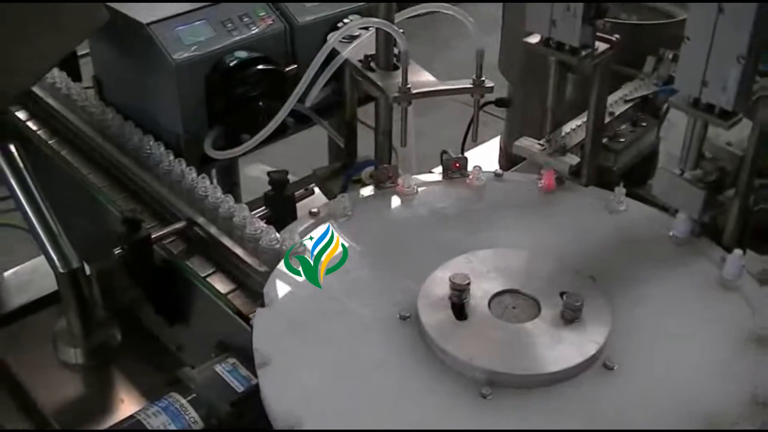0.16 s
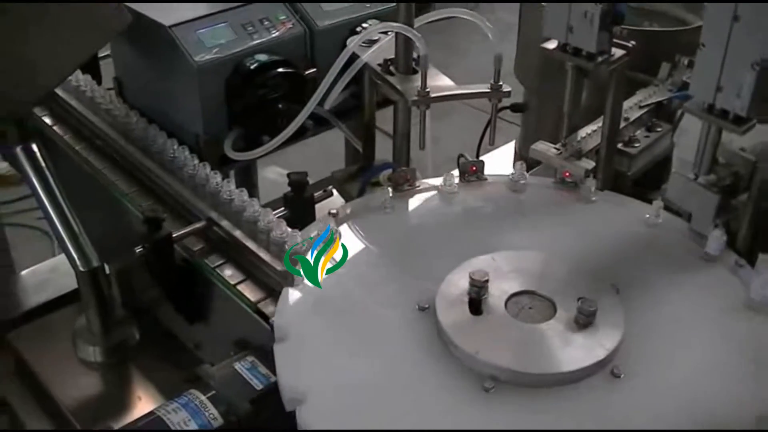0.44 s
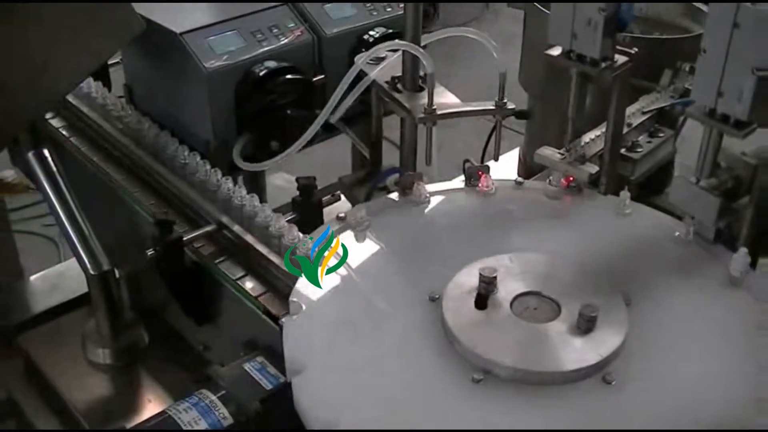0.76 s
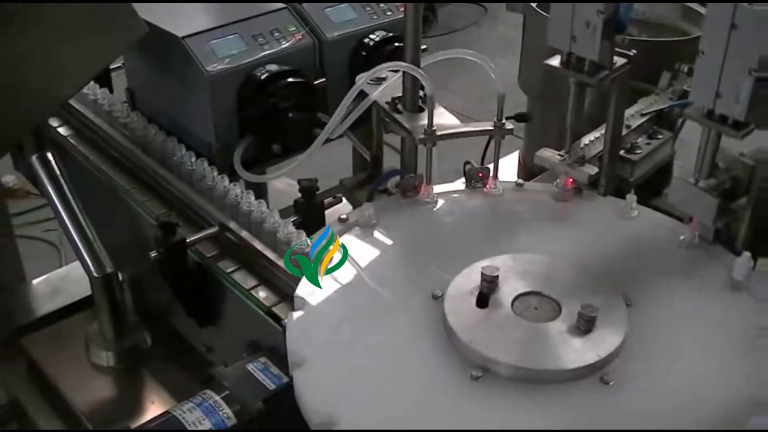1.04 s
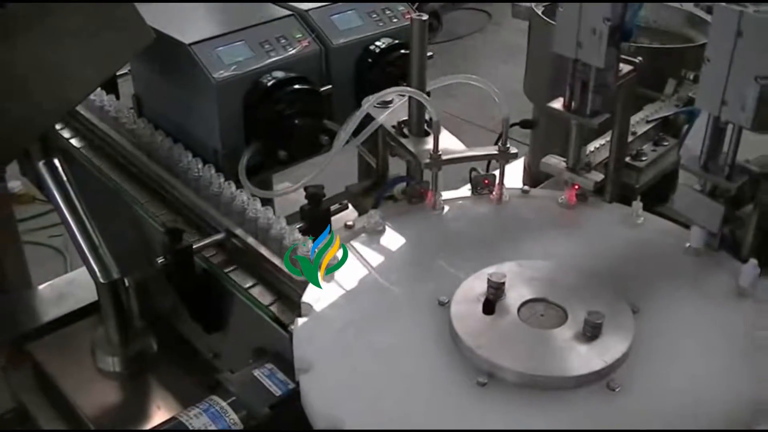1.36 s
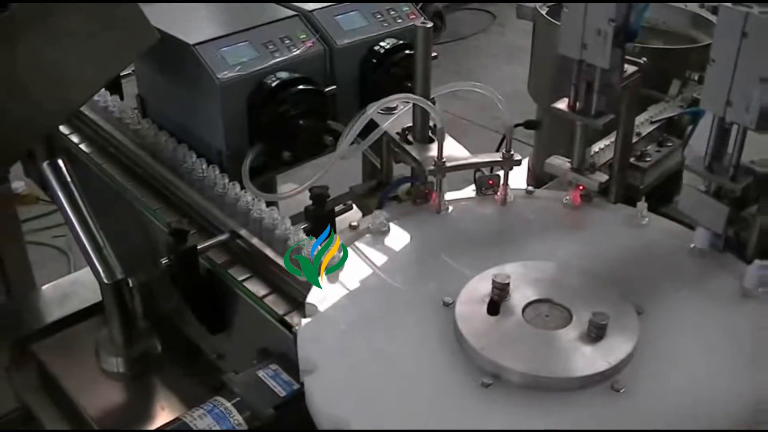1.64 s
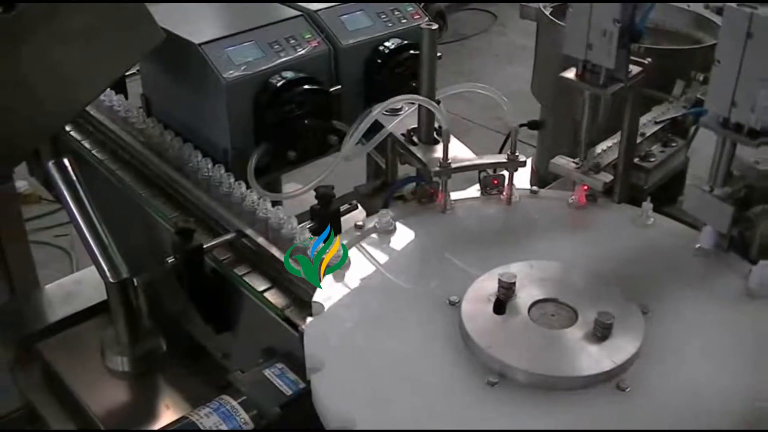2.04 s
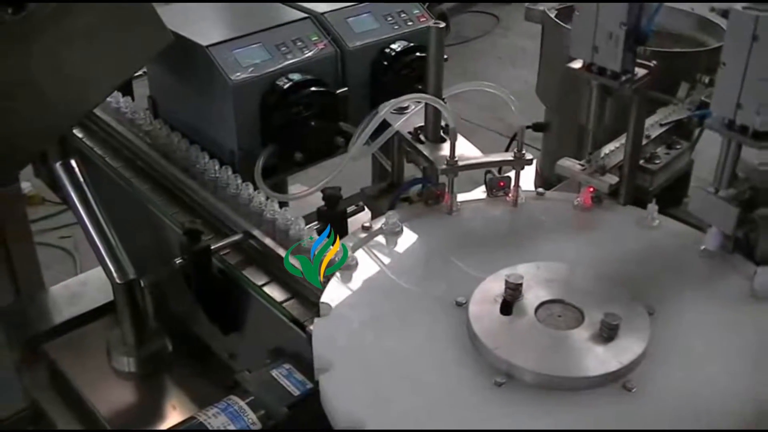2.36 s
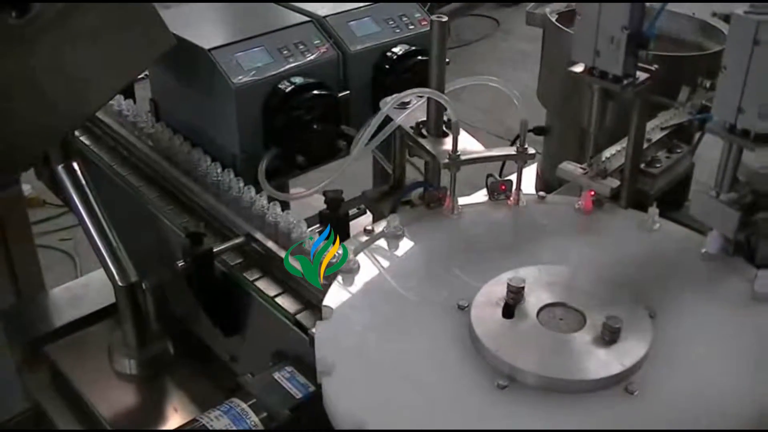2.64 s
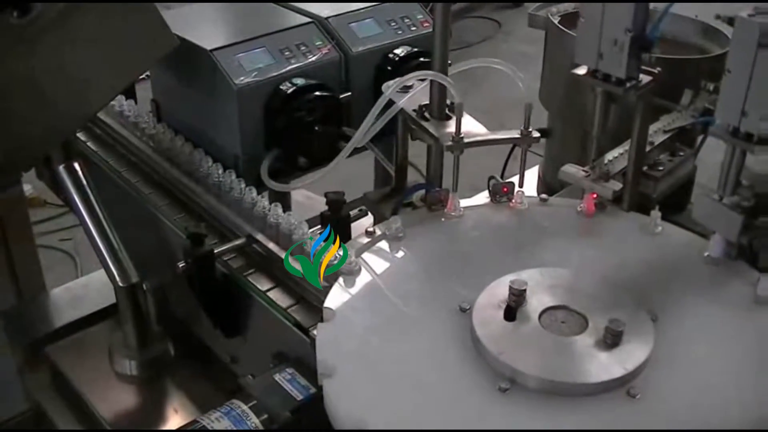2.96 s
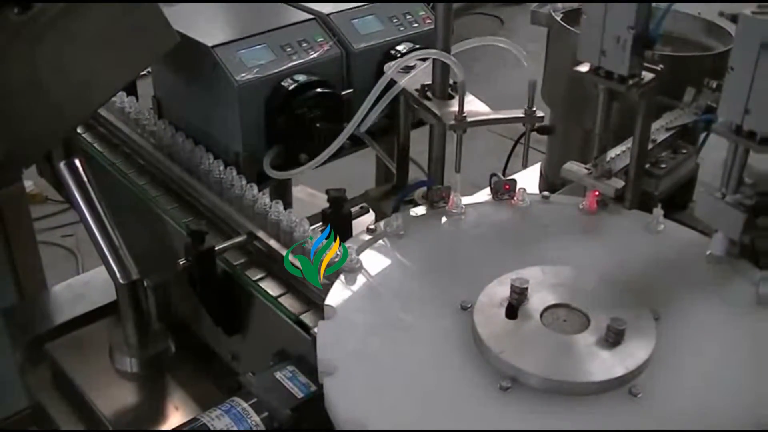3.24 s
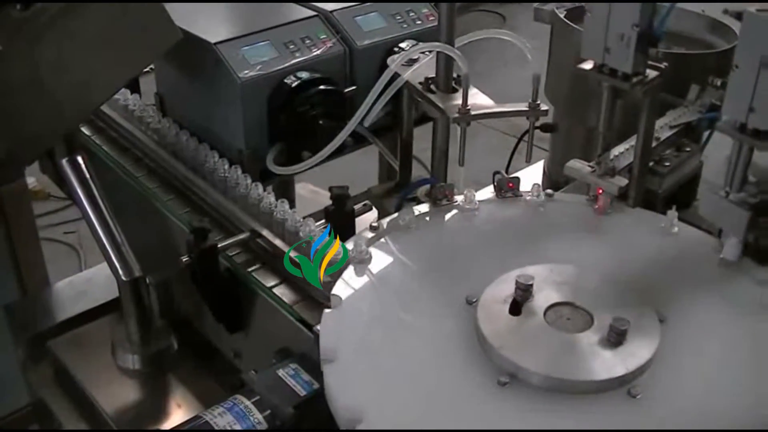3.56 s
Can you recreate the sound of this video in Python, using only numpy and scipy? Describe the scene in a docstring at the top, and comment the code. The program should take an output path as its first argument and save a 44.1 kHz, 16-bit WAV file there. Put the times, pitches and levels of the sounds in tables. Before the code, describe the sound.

Filling line machinery running continuously: bright air hiss, metallic parts rattle, low mains hum, scattered clacks

```python
"""At a bottle filling line in a hall, on a nearly mono stereo pair with no echo added. From the start a feeder
hums on multiples of the mains over rumble and a faint drone (sines, shaped noise), its load rattles on steel
tracks (random taps through resonances) and compressed air hisses from nozzles (noise with fixed peaks); on top,
the peaks in the hiss slowly rise and fall in strength. Soft thuds come from 0.1 s, knocks (decaying tones with
grainy clacks) from 0.86 s, three hard ticks from 1.34 s and a short extra puff of air at 2.13 s."""
import sys
import numpy as np
from scipy import signal
from scipy.fft import rfft, irfft
from scipy.io import wavfile
from scipy.ndimage import uniform_filter1d

SR = 44100
rng = np.random.default_rng(int(sys.argv[2]) if len(sys.argv) > 2 else 0)


def dump(signal):
    """Clip the signal to [-1, 1] and save it as 16-bit WAV at the path in sys.argv[1]."""
    limited = np.clip(np.atleast_2d(signal).T, -1, 1)
    pcm = np.round(limited * 32767).astype(np.int16)
    wavfile.write(sys.argv[1], SR, pcm)


N = 162729  # length in samples
HZ = np.fft.rfftfreq(1024, 1 / SR)  # bands of the short-time spectra


def gain_of(db):
    """Decibels to gain."""
    return 10 ** (np.asarray(db) / 20)


def evened(x):
    """Scales to rms 1."""
    return x / np.sqrt(np.mean(abs(x) ** 2) + 1e-20)


def read(points, hz):
    """Reads a spectrum table on a log frequency axis."""
    f, value = np.transpose(points)
    return np.interp(np.log(hz + 1), np.log(f + 1), value)


def follow(rows, t, axis=1):
    """Reads one column of a time table at times t."""
    return np.interp(t, np.array(rows)[:, 0], np.array(rows)[:, axis])


def wander(hz):
    """Slow random curve of rms 1: sines from hz / 10 up to hz, the slower ones larger."""
    t = np.arange(N // 256 + 2) * 256 / SR
    curve = sum(np.sin(2 * np.pi * (f * t + rng.random())) / np.sqrt(f) for f in np.geomspace(hz / 10, hz, 20))
    return np.interp(np.arange(N) / SR, t, evened(curve))


def patches(shape, bands, frames):
    """Random field of rms 1, smoothed over neighbouring bands and frames."""
    field = uniform_filter1d(rng.standard_normal(shape), bands, 0)
    return evened(uniform_filter1d(field, frames, 1))


def shaped(x, field_db, patchy_db):
    """Colours a sound by a level field and by small random patches; rms 1."""
    z = signal.stft(x, nperseg=1024, noverlap=768)[2]
    t = np.arange(z.shape[1]) * 256 / SR
    gain = gain_of(field_db(t) + patchy_db * patches(z.shape, 8, 10))
    return evened(signal.istft(z * gain, nperseg=1024, noverlap=768)[1][:N])


def resonate(x, hz, width):
    """Fixed one-pole resonance: shifts hz down to zero, smooths, and shifts back."""
    turn = np.exp(2j * np.pi * hz * np.arange(len(x)) / SR)
    r = np.exp(-np.pi * width / SR)
    return 2 * (turn * signal.lfilter([1 - r], [1, -r], x / turn)).real


def add(mix, s, sound):
    """Mixes a sound in at time s."""
    part = mix[round(s * SR):][:len(sound)]
    part += sound[:len(part)]


def ring(hz, t60, rise_s, rough):
    """A struck tone with a smear of close neighbours, falling 60 dB in t60 seconds."""
    t = np.arange(0, max(t60, .01), 1 / SR)
    smear = evened(resonate(rng.standard_normal(SR)[:len(t)], hz, hz / 8))
    tone = np.sin(2 * np.pi * hz * t) + rough * smear
    return tone * np.minimum(t / rise_s, 1) * gain_of(-60 * t / t60)


def feeder():
    """Mains-locked hum lines over a low noise rumble; both swell together."""
    # hum lines: multiple of mains, level/dB at the mean swell
    hum_lines = [(3, -43.5), (4, -43), (6, -44), (7, -44), (8, -41), (9, -48), (10, -54), (11, -49.5),
                 (12, -37), (13, -40), (14, -56.5), (15, -55), (18, -49.5), (20, -50), (21, -55.5),
                 (22, -55), (23, -44.5), (25, -48.5), (31, -50)]
    # swell of hum and rumble: t/s, level/dB
    swell = [(0.04, -29.5), (0.05, -31.5), (1.55, -31), (2.49, -28), (2.53, -28), (2.62, -27.5),
             (2.97, -31), (3.65, -30)]
    # rumble colour: f/Hz, relative level/dB per Hz
    rumble_tone = [(12, -68), (20, -32), (70, -23), (100, -19), (135, -9), (209, -8), (248, -8), (401, -3),
                   (492, -9.5), (605, -0.5), (718, -6.5), (950, -11), (1200, -15)]
    mains_hz, waver_db, rumble_db = 49.965, .6, -6.5  # rumble_db is relative to the swell level
    # the lines keep loosely in step: one stroke per mains cycle
    stroke_rad, stroke_scatter_rad = 2.6, .6
    t = np.arange(N) / SR
    hum = np.zeros(N)
    for k, db in hum_lines:
        phase = stroke_rad + stroke_scatter_rad * rng.standard_normal()
        line = np.sqrt(2) * np.cos(2 * np.pi * k * mains_hz * t + phase)
        hum += gain_of(db + waver_db * wander(4)) * line
    f = np.fft.rfftfreq(N, 1 / SR)
    colour = gain_of(read(rumble_tone, f)) * (f < 1250)
    rumble = evened(irfft(rfft(rng.standard_normal(N)) * colour, N))
    low = follow(swell, t)
    return hum * gain_of(low - low.mean()) + rumble * gain_of(low + rumble_db)


def drone():
    """A faint low sine that comes and goes."""
    # t/s, level/dB
    drone_level = [(0, -66), (.5, -70), (1.35, -70), (1.45, -59), (2.4, -57), (2.5, -66), (2.62, -60),
                   (2.75, -72), (3.05, -80), (3.15, -65), (3.69, -64)]
    t = np.arange(N) / SR
    return gain_of(follow(drone_level, t)) * np.sqrt(2) * np.sin(2 * np.pi * 62.5 * t)


def rattle():
    """Dense taps of parts colour into a clatter and set the steel tracks ringing."""
    # rattle course, followed by clatter and rings: t/s, level/dB
    rattle_level = [(0, -27), (.5, -27.5), (.9, -27.5), (1.3, -26.5), (1.6, -27.5), (1.8, -26),
                    (2.5, -25.5), (3.0, -26), (3.18, -26), (3.24, -29), (3.3, -27), (3.37, -25.5),
                    (3.48, -27), (3.6, -28), (3.69, -26)]
    # clatter colour: f/Hz, relative level/dB per Hz
    clatter_tone = [(530, -24), (900, -9.5), (948, -10.5), (1190, -6), (1550, -3.5), (1660, -1),
                    (1810, -2.5), (2190, -2.5), (2400, -3), (2640, -2), (2870, -4.5), (4200, -5.5),
                    (5460, -31), (9240, -120)]
    # track resonances: f/Hz, width/Hz, level/dB at the mean rattle level
    track = [(1430, 98, -48.5), (1670, 6, -48.5), (1683, 45, -42.5), (1888, 23, -52), (2136, 57, -51),
             (2265, 12, -51), (2453, 63, -49), (2537, 20, -49.5), (2613, 23, -45), (2644, 25, -44),
             (2720, 24, -52.5), (3620, 35, -47)]
    taps_per_s, tap_spread_db, track_swell_db = 4000, 1.5, 2
    struck = rng.random(N) < taps_per_s / SR
    strength = gain_of(tap_spread_db * rng.exponential(1, N))
    taps = evened(strength * struck * rng.choice([-1., 1.], N))
    taps = evened(taps + 1.53 * rng.standard_normal(N))  # noise fills in between the taps
    tone = read([(600, -60)] + list(clatter_tone) + [(4800, -60)], HZ)[:, None]
    level = follow(rattle_level, np.arange(N) / SR)
    clatter = shaped(taps, lambda t: tone, patchy_db=1.17) * gain_of(level - 0.5)
    rings = np.zeros(N)
    for hz, width, db in track:
        sounding = evened(resonate(resonate(taps, hz, width), hz, 3 * width))
        rings += gain_of(db + track_swell_db * wander(15)) * sounding
    return clatter + rings * gain_of(level - level.mean())


def air():
    """Turbulent jets: hiss with fixed peaks, the top octave on its own course. On top, the peaks in the hiss
    slowly rise and fall in strength."""
    # jet course: t/s, level/dB before a fixed 0.31 dB lift, top octave/dB against top_ref_db
    jets = [(0, -17, -10.5), (.12, -20.5, -8), (.2, -18, -8.5), (.32, -20, -8), (.4, -19, -7.5),
            (.9, -19, -8), (1.25, -18.5, -9.5), (1.45, -20, -9), (1.6, -19, -10), (2.05, -18.5, -9),
            (2.075, -21, -8), (2.115, -21, -4), (2.14, -19, -9), (2.3, -19, -8), (2.9, -19, -8.5),
            (3.22, -19, -9.5), (3.29, -19.5, -8.5), (3.37, -18.5, -8.5), (3.69, -19.5, -6.5)]
    # hiss colour: f/Hz, relative level/dB per Hz
    hiss_tone = [(2120, -26), (3600, -9), (5040, -3), (5630, 0), (6680, 0), (7280, -1), (7830, -2.5),
                 (8960, -4.5), (10600, -8), (13800, -12.5), (14200, -13.5), (15600, -25)]
    # peaks of the hiss: f/Hz, width/Hz, mean lift/dB
    hiss_peaks = [(4340, 110, 5.5), (4730, 150, 4), (5440, 105, 5.5), (5840, 150, 4.5), (6340, 300, 4),
                  (6790, 200, 3), (7840, 200, 4), (8050, 160, 4), (8750, 200, 6), (9700, 300, 3),
                  (13700, 400, 0)]
    top_hz, top_ref_db = 9000, -9
    lift_wander = 0.36  # each lift wanders slowly by this share, rms
    tone = read([(3000, -58)] + list(hiss_tone), HZ)[:, None]
    peaks = np.array([db / (1 + (2 * (HZ - hz) / width) ** 2) for hz, width, db in hiss_peaks]).T
    strength = np.array([1 + lift_wander * wander(1.51) for _ in hiss_peaks])
    top = 1 / (1 + np.exp((top_hz - HZ) / 400))[:, None]  # soft step up into the top octave

    def field(t):
        """Level in dB of each band at each time."""
        lifts = peaks @ strength[:, np.minimum(t * SR, N - 1).astype(int)]
        return tone + lifts + top * (follow(jets, t, axis=2) - top_ref_db)

    gusts_db = .3 * wander(40)
    hiss = shaped(rng.standard_normal(N), field, patchy_db=1.22)
    return hiss * gain_of(follow(jets, np.arange(N) / SR) + 0.31 + gusts_db)


def side_noise():
    """Faint noise, to go opposite into left and right, its treble varied in random patches."""
    # colour of the unlike share: f/Hz, relative level/dB per Hz
    side_tone = [(18, -70), (30, -44), (70, -22), (133, -1.5), (389, -1), (480, -4), (640, -0.5),
                 (729, -5.5), (1140, -4.5), (1600, -11.5), (2130, -13.5), (3070, -12.5), (4400, -5.5),
                 (6390, 2), (8520, -8.5), (14000, -5.5), (15600, -17)]
    side_db, patchy_db, treble_hz = -38.5, 17, 1500
    z = signal.stft(rng.standard_normal(N), nperseg=1024, noverlap=768)[2]
    treble = (HZ ** 2 / (HZ ** 2 + treble_hz ** 2))[:, None]
    varied = gain_of(patchy_db * np.minimum(patches(z.shape, 10, 6), .5) * treble)
    varied /= np.sqrt((varied ** 2).mean(1, keepdims=True))  # rms gain 1 in each band
    z = z * gain_of(read(side_tone, HZ))[:, None] * varied
    return gain_of(side_db) * evened(signal.istft(z, nperseg=1024, noverlap=768)[1][:N])


def thuds():
    """Soft low thuds: slow-rising, decaying tones with a little roughness."""
    # t/s, level/dB of the tone's amplitude before rise and decay
    thud_rows = [(.1, -47), (.25, -44), (.4, -47), (.55, -44), (.7, -47), (1.03, -45), (1.13, -47),
                 (1.32, -46), (1.43, -52), (1.53, -49), (1.7, -45), (1.93, -41), (2.2, -43), (2.62, -41),
                 (2.73, -46), (2.9, -44), (3.04, -51), (3.3, -49), (3.4, -47)]
    out = np.zeros(N)
    for s, db in thud_rows:
        add(out, s, gain_of(db) * ring(97.5, t60=0.29, rise_s=.015, rough=0.25))
    return out


def knocks():
    """Knocks of the cycle: a ringing tone and a clack of sparse grains through a broad resonance."""
    # t/s, ring level/dB before rise and decay, ring f/Hz, ring t60/s, clack level/dB before decay
    knock_rows = [(.855, -23, 1664, .12, -34), (1.330, -25, 2130, .2, -26), (1.352, -27.5, 1232, 0.47, -36),
                  (1.492, -22.5, 1248, .22, -26), (1.553, -25, 1223, .12, -36), (2.63, -31, 888, .2, -24),
                  (3.305, -23.5, 1607, .2, -23.5), (3.36, -26, 2400, 0.18, -24)]
    clack_hz, clack_width_hz, clack_t60 = 2300, 1800, 0.13  # t60 in s
    out = np.zeros(N)
    t = np.arange(SR // 4) / SR
    for s, db, hz, t60, clack_db in knock_rows:
        add(out, s, gain_of(db) * ring(hz, t60, rise_s=0.0023, rough=.15))
        grains = rng.standard_normal(len(t)) * (rng.random(len(t)) < .03)
        clack = resonate(np.diff(grains, prepend=0), clack_hz, clack_width_hz)
        clack = evened(resonate(clack, clack_hz, clack_width_hz))
        add(out, s, gain_of(clack_db - 60 * t / clack_t60) * clack)
    return out


def ticks():
    """Small hard ticks: very short, rough, high tones."""
    # t/s, level/dB of the tone's amplitude before rise and decay, f/Hz
    tick_rows = [(1.340, -17, 10600), (1.420, -15.5, 10800), (1.437, -18, 10400)]
    out = np.zeros(N)
    for s, db, hz in tick_rows:
        add(out, s, gain_of(db) * ring(hz, t60=.026, rise_s=.001, rough=0.71))
    return out


def puff():
    """A short extra puff of air: narrow-band noise under a half-sine swell."""
    start_s, len_s, db, hz, width_hz = 2.13, .17, -33, 11500, 700
    out = np.zeros(N)
    t = np.arange(SR // 4) / SR
    hiss = evened(resonate(resonate(rng.standard_normal(len(t)), hz, width_hz), hz, width_hz))
    add(out, start_s, gain_of(db) * hiss * np.sin(np.pi * np.minimum(t / len_s, 1)))
    return out


def scene():
    """Every source sits in the middle; faint opposite-signed noise sets left from right."""
    mid = feeder() + drone() + rattle() + air() + thuds() + knocks() + ticks() + puff()
    side = side_noise()
    right_db = 0.34  # the right side is slightly louder
    return np.array([mid + side, (mid - side) * gain_of(right_db)])


def record(dry):
    """The band limit: a steep low-pass at 15.73 kHz."""
    low_pass = signal.firwin(1023, 15730, window=("kaiser", 10), fs=SR)
    return signal.oaconvolve(dry, low_pass[None], "same")


dry = scene()
out = record(dry)
dump(out)
```